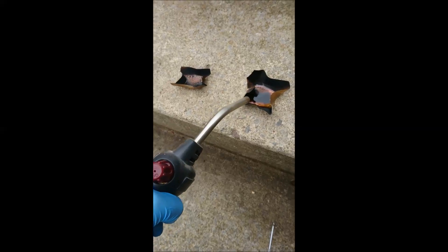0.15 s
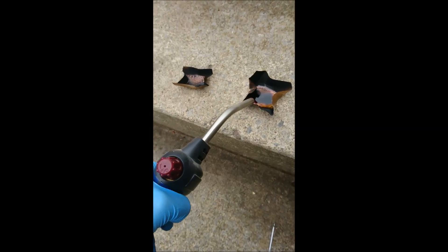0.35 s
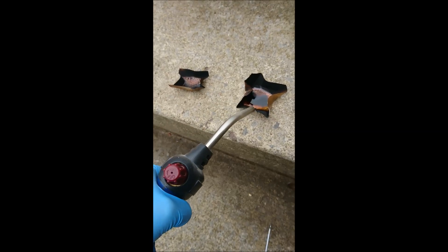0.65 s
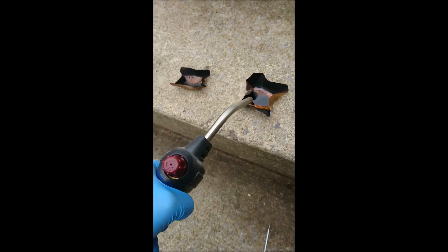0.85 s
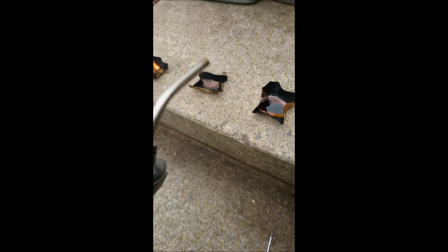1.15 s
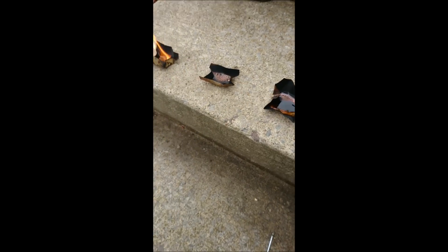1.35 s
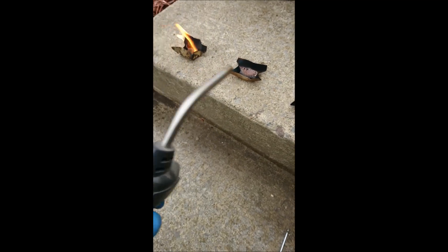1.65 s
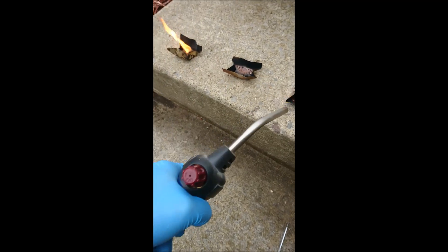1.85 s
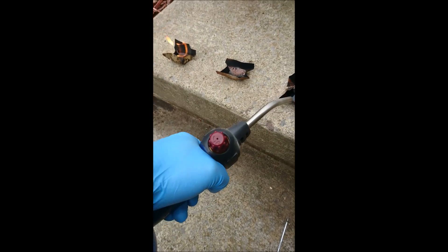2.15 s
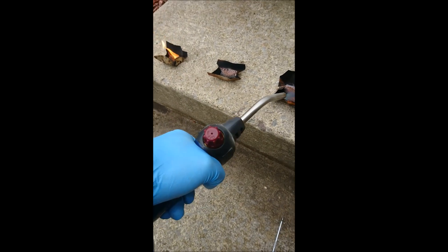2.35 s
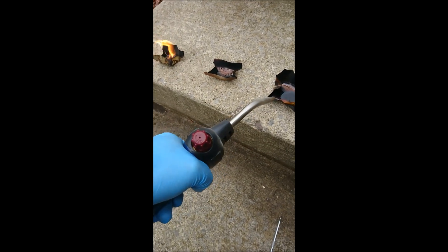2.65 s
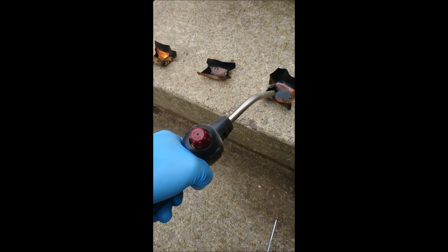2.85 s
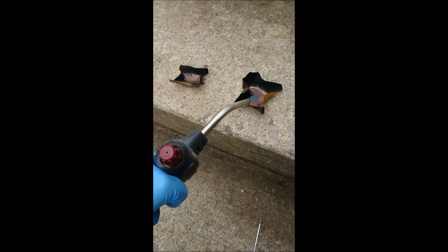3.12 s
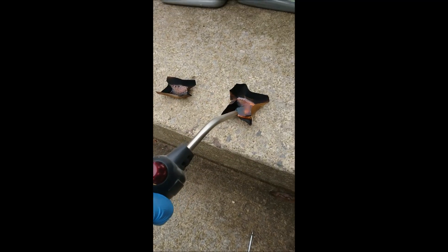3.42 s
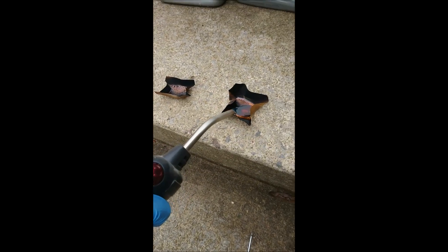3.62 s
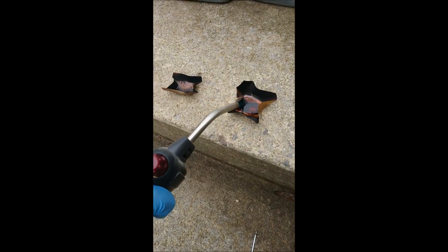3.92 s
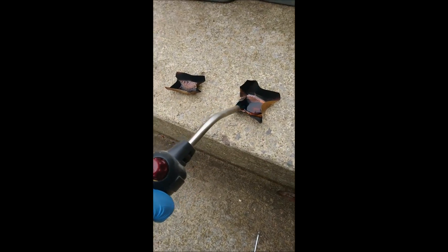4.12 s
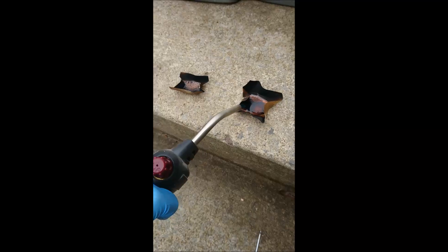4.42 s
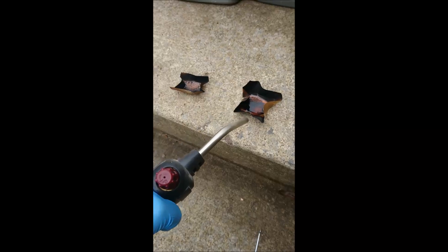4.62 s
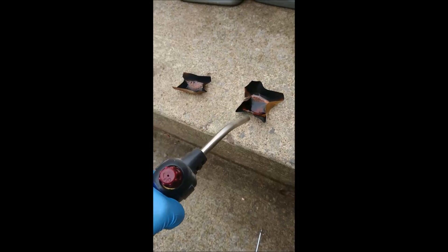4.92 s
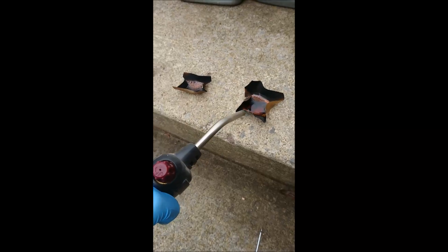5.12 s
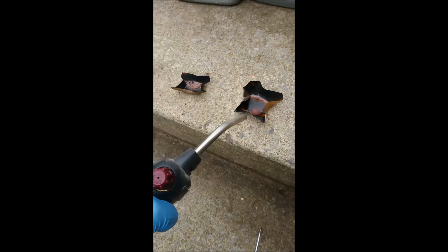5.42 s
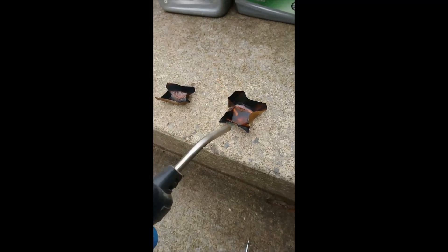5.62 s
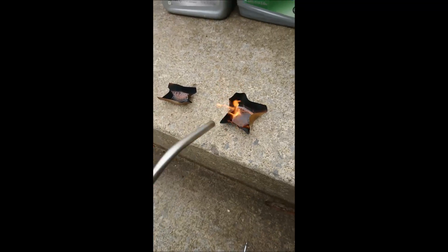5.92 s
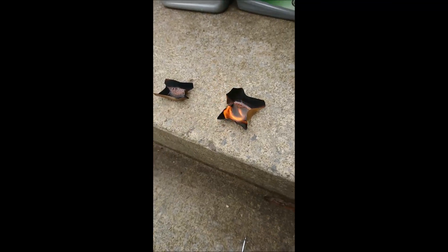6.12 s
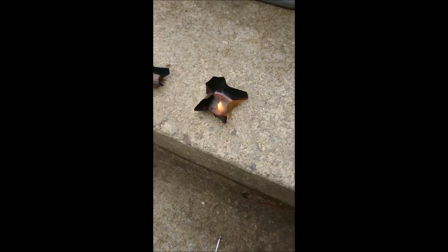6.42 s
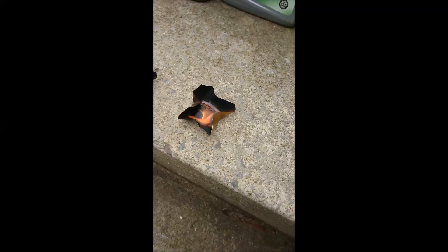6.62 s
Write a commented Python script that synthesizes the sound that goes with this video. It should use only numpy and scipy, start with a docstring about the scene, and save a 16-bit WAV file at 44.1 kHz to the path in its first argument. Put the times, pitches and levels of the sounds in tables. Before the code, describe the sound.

Outdoors, close stereo microphones over a concrete step, with a faint low rumble and thin even hiss. At 0.1 s a very loud, sharp igniter snap cracks with a low handle thump and short metallic ring; a gas puff flaps and dies with a soft thud by 0.3. Plastic trigger clicks tick at about 0.45 and 0.62 over faint seeping gas. A second snap at 0.73 brings another brief sputter and a thin, fading whistle. More clicks come from 1.07 to 1.24. The third snap at 1.34 lights the flame with a small whoosh, and a last click follows at 1.6. The flame roars and hisses steadily, far quieter than the snaps. From about 2.2 it presses on a charred scrap, turning duller, fluttering and uneven, with little pops and faint sizzling, especially from 3 to 5. Around 6 it lifts away, growing brighter and stronger, its concrete echo sweeping, and still burns at the end.

```python
"""The flame of a handheld gas torch, outdoors over a concrete step, close to two microphones: noise with a
fluttering envelope roars and hisses, is played on a charred scrap and lifted away, and delayed copies are its
echo off the concrete, sweeping with the height of the nozzle. Before it, three piezo snaps (noise bursts and
damped modes) bring two sputtering false starts and then the lasting flame. Trigger clicks, gas seeping and
whistling in the tube (resonated noise and gliding tones) and a low outdoor rumble surround them."""
import sys
import numpy as np
from scipy import signal
from scipy.fft import rfft, irfft, next_fast_len
from scipy.io import wavfile
from scipy.ndimage import uniform_filter1d, map_coordinates

SR = 44100
rng = np.random.default_rng(int(sys.argv[2]) if len(sys.argv) > 2 else 0)


def wrap_up_sound(samples):
    """Save the sound to the file named by the first command line argument, as 16-bit audio."""
    columns = np.atleast_2d(samples).T
    # keep every value between -1 and 1, then stretch to whole-number steps
    tamed = np.clip(columns, -1, 1)
    steps = np.round(tamed * 32767).astype(np.int16)
    wavfile.write(sys.argv[1], SR, steps)


N = 298557
T = np.arange(N) / SR
LIT_S = 1.352  # the lasting flame lights


def gain_of(db):
    """Level: decibels to an amplitude ratio."""
    return 10 ** (np.asarray(db) / 20)


def evened(x):
    """Normalization: scales to a root-mean-square of 1."""
    return x / np.sqrt(np.mean(x ** 2) + 1e-20)


def follow(rows):
    """Linear interpolation: each column of a curve table at every sample."""
    seconds, *columns = np.transpose(rows)
    return [np.interp(T, seconds, column) for column in columns]


def coloured(x, spectrum, tilt_db=0):
    """Minimum-phase filtering: the spectrum, tilted by dB per octave, keeps the power of white noise."""
    size = next_fast_len(x.shape[-1] + 4096)
    octave = np.log2(abs(np.fft.fftfreq(size, 1 / SR)) + 1)
    hz, db = np.transpose(spectrum)
    corner_octave = np.log2(hz + 1)
    db = np.interp(octave, corner_octave, db + tilt_db * corner_octave)
    log_gain = np.log(evened(gain_of(db)) + 1e-6)
    # the phase that makes the filter causal is the Hilbert transform of the log gain
    response = np.exp(np.conj(signal.hilbert(log_gain)))
    return np.fft.ifft(np.fft.fft(x, size) * response).real[..., :x.shape[-1]]


def wander(hz):
    """Band-limited random modulation: rms 1, changes up to about hz, the drift below 6 Hz held back."""
    f = np.fft.rfftfreq(N, 1 / SR)
    response = f / (f + 6) / np.sqrt(1 + (f / hz) ** 4)
    return evened(irfft(rfft(rng.standard_normal(N)) * response, N))


def noise_pair(apart, size=N):
    """Partial coherence: white noise at two microphones; the power share 'apart' is not common to both."""
    apart = np.clip(apart, 0, 1)
    common = rng.standard_normal(size)
    return np.sqrt(1 - apart) * common + np.sqrt(apart) * rng.standard_normal((2, size))


def panned(x, left_db):
    """Interchannel level difference: makes the left side louder by left_db."""
    return x * gain_of([[left_db / 2], [-left_db / 2]])


def resonate(x, hz, width):
    """Tuned resonance: a steep two-pole peak that can follow a pitch curve; rms 1."""
    turn = np.exp(2j * np.pi * np.cumsum(hz * np.ones(N)) / SR)
    r = np.exp(-np.pi * width / SR)
    # shift the pitch to zero, low-pass there, and shift back
    slow = signal.lfilter([1], [1, -2 * r, r * r], x / turn)
    return evened((turn * slow).real)


def swing(t, hz, t60, rise):
    """Damped oscillation: one heavily damped mode that builds up over 'rise' seconds."""
    t = np.maximum(t, 0)
    return -np.sin(2 * np.pi * hz * t) * np.exp(-np.log(1000) * t / t60) * (1 - np.exp(-t / rise))


def add(mix, s, sound):
    """Superposition: mixes a sound in at time s."""
    part = mix[:, max(round(s * SR), 0):][:, :sound.shape[1]]
    part += sound[:, :part.shape[1]]


# spectrum of the open air: pitch_hz, level_db (relative)
AIR_SPECTRUM = [(30, 0), (55, 23.5), (100, 23), (170, 18), (320, 9.5), (700, 5), (1500, -4), (2000, -35),
                (3100, -2.5), (7200, -1), (8200, -7), (10500, -5.5), (16000, -61)]
AIR_DB = -56.5


def air():
    """Steady broadband noise: a low outdoor rumble and a thin, even hiss."""
    return panned(gain_of(AIR_DB) * evened(coloured(noise_pair(0.28), AIR_SPECTRUM)), left_db=-3.5)


# resonances of the gas-filled tube: pitch_hz, width_hz, level_db
TUBE_RESONANCES = [(1230, 96, -71), (2210, 73, -74), (2564, 240, -65.5), (3770, 170, -72)]
# spectrum of the gas seeping from the jet: pitch_hz, level_db (relative)
SEEP_SPECTRUM = [(1200, -0.5), (3000, -7), (6800, -2), (8200, -13), (10000, -8), (15000, -12)]
# knocks that set the gas in the tube ringing: start_s, pitch_hz (once settled), level_db
TUBE_WHISTLES = [(0.462, 1624, -54.5), (0.738, 1610, -41.5), (0.738, 2164, -50)]
# the whistle starts sharp and settles as the tube refills
WHISTLE_SHARP_HZ, WHISTLE_SETTLE_S, WHISTLE_T60_S = 80, 0.0396, 0.45


def unlit_gas(seep_db=-62, waver_db=2.5):
    """Tube resonance: seeping gas drives it with noise until the flame is lit; a knock makes it whistle."""
    whistle, t = np.zeros((2, N)), np.arange(SR) / SR
    for s, hz, db in TUBE_WHISTLES:
        turns = np.cumsum(hz + WHISTLE_SHARP_HZ * np.exp(-t / WHISTLE_SETTLE_S)) / SR
        tone = gain_of(db - 60 * t / WHISTLE_T60_S) * np.sqrt(2) * np.sin(2 * np.pi * turns)
        add(whistle, s, tone[None])
    tube = sum(gain_of(db) * resonate(noise_pair(0.85), hz, width) for hz, width, db in TUBE_RESONANCES)
    seep = gain_of(seep_db) * coloured(noise_pair(1.0), SEEP_SPECTRUM)
    return (gain_of(waver_db * wander(hz=30)) * whistle + tube + seep) * (T < LIT_S)


# clicks of the trigger: start_s, scrape_db, brightness_db_per_octave, handle_knock_db
TRIGGER_CLICKS = [(0.4572, -33, 4.5, -25), (0.4608, -42.5, -2.5, -39), (0.6167, -36, 4.5, -29.5),
                  (0.632, -33.5, -4, -34), (1.073, -59, -5, -37.5), (1.1295, -29.5, 3.5, -54),
                  (1.133, -30.5, 4, -31), (1.2373, -38.5, -1, -28), (1.593, -33, 2.5, -27)]
# spectrum of the plastic scrape: pitch_hz, level_db (relative)
SCRAPE_SPECTRUM = [(240, -35), (400, -22.5), (588, -6.5), (1270, -4.5), (2510, -3), (3260, -17),
                   (3810, -8.5), (5030, -20), (5520, -9.5), (7990, -28.5), (9180, -25), (13500, -39),
                   (16000, -33)]


def trigger(fade_s=0.0052, tail_db=-22, tail_s=0.057):
    """Friction and impact: the plastic trigger catches and springs back, a short scrape and a hollow knock."""
    out, t = np.zeros((2, N)), np.arange(SR // 5) / SR
    for s, db, bright_db, knock_db in TRIGGER_CLICKS:
        scrape = t / fade_s * np.exp(1 - t / fade_s * 2) * 2 + gain_of(tail_db) * np.exp(-t / tail_s)
        noise = scrape * noise_pair(0.89, size=len(t))
        tick = gain_of(db) * coloured(noise, SCRAPE_SPECTRUM, bright_db)
        add(out, s, tick + gain_of(knock_db) * swing(t, hz=617, t60=0.03, rise=0.0019))
    return out


# false starts of the flame: start_s, length_s, level_db (reached at the end)
FALSE_STARTS = [(0.131, 0.0088, -33.5), (0.186, 0.088, -33), (0.732, 0.031, -38.5), (0.798, 0.035, -34.5)]
# spectrum of the flapping flame: pitch_hz, level_db (relative)
SPUTTER_SPECTRUM = [(30, -10), (130, -1), (288, 0.5), (383, -11.5), (624, -4), (1380, -17.5), (2040, -19.5),
                    (4000, -30), (7170, -33), (14000, -51)]
# low thuds as a pocket of gas goes up: start_s, level_db
GAS_THUDS = [(0.159, -30), (0.2749, -23.5), (0.835, -25.5)]
SPUTTER_RISE_S, SPUTTER_GROWTH_DB_PER_S, SPUTTER_OUT_S = 0.02, 28, 0.017


def sputter(flutter_db=1.5):
    """Unstable combustion: a pocket of gas catches, flaps ever harder at the nozzle and blows out."""
    burning = np.zeros(N)
    for s, length, db in FALSE_STARTS:
        past_end = T - s - length
        rise = np.clip((T - s) / SPUTTER_RISE_S, 0, 1)
        growth = rise * gain_of(db + SPUTTER_GROWTH_DB_PER_S * np.minimum(past_end, 0))
        burning += growth * np.exp(-np.maximum(past_end, 0) / SPUTTER_OUT_S)
    puffs = evened(gain_of(flutter_db * wander(hz=220)) * noise_pair(0.54))
    out, t = burning * coloured(puffs, SPUTTER_SPECTRUM), np.arange(SR // 8) / SR
    for s, db in GAS_THUDS:
        add(out, s, gain_of(db) * swing(t, hz=173, t60=0.061, rise=0.0011)[None])
    return panned(out, left_db=-1.5)


def ring(modes, t):
    """Modal decay: dying modes, excited differently by each blow as the grip shifts."""
    total = 0
    for hz, db, t60 in modes:
        level = gain_of(db + 3 * rng.uniform(-1, 1) - 60 * t / t60)
        turns = hz * rng.uniform(.996, 1.004) * t
        # each mode reaches the two microphones in its own phase
        total = total + level * np.sin(2 * np.pi * (turns + rng.random((2, 1))))
    return total


# spectrum of the igniter's crack, also of its fine ringing: pitch_hz, level_db (relative)
CRACK_SPECTRUM = [(240, -34), (600, -17), (1200, -5.5), (1450, -20), (2300, 1.5), (3050, -8), (4300, 3),
                  (5100, 2), (5450, -2), (5800, -1.5), (7400, -1.5), (7900, -6), (9000, 0.5), (10500, -11),
                  (14500, -5), (16000, -24)]


def fine_ring(t, count=70, level_db=-31, t60_s=0.14):
    """High modal density: many faint modes of the torch's small parts, coloured like the crack."""
    cloud = sum(np.sin(2 * np.pi * (hz * t + rng.random((2, 1)))) for hz in rng.uniform(1400, 10000, count))
    return coloured(gain_of(level_db - 60 * t / t60_s) * evened(cloud), CRACK_SPECTRUM)


# igniter snaps: start_s, crack_db, thump_db, handle_knock_db, metal_ring_db, spring_zing_db
IGNITER_SNAPS = [(0.1103, -8, 1, -17, -30.5, -34.5), (0.7303, -8.5, -0.5, -4, -30, -51),
                 (1.3448, -8, -4.5, -5, -33.5, -40)]
# modes of the torch's case: pitch_hz, level_db, t60_s
CASE_MODES = [(1720, -7, 0.093), (2214, 2, 0.038), (2370, -17, 0.092), (3530, -14.5, 0.097),
              (4130, 5, 0.032), (4350, -15, 0.1), (4700, -10, 0.12), (4850, -10, 0.047), (5660, -7, 0.071),
              (7550, -21, 0.075), (8800, -12, 0.023)]
# modes of its tube and fittings: pitch_hz, level_db, t60_s
METAL_MODES = [(1500, -8, 0.23), (1820, -19.5, 0.49), (3700, -4, 0.31), (4140, -7.5, 0.34),
               (4743, -3, 0.23), (5100, -10, 0.29), (6930, 5, 0.15), (7000, 4, 0.1)]
SPRING_HZ, SPRING_SWELL_S = 6815, 0.027  # the return spring takes up the blow slowly
JOSTLE = 0.3  # share by which the rattle makes the metal ring uneven


def igniter(chatter_s=0.0032, fade_s=0.0024, rattle_db=-24, rattle_s=0.028, rattle_rough_db=-3,
            case_db=-15, left_tilt_db=-2):
    """Impact excitation: the hammer chatters, loose parts rattle, case and spring ring, the torch recoils."""
    out, t = np.zeros((2, N)), np.arange(SR // 2) / SR
    for s, crack_db, thump_db, knock_db, metal_db, spring_db in IGNITER_SNAPS:
        loose = wander(hz=300)[:len(t)]
        rattle = gain_of(rattle_db + rattle_rough_db * loose) * np.exp(-t / rattle_s)
        blow = np.exp(-np.maximum(t - chatter_s, 0) / fade_s) + rattle * (t > chatter_s)
        left, right = gain_of(crack_db) * blow * noise_pair(0.97, size=len(t))
        # the left microphone faces away
        crack = np.array([coloured(left, CRACK_SPECTRUM, left_tilt_db), coloured(right, CRACK_SPECTRUM)])
        case_ring = gain_of(case_db) * ring(CASE_MODES, t)
        metal_ring = gain_of(metal_db) * ring(METAL_MODES, t) * (1 + JOSTLE * loose)
        rings = case_ring + metal_ring + fine_ring(t)
        spring_swell = (t / SPRING_SWELL_S * np.exp(1 - t / SPRING_SWELL_S)) ** 3
        zing = spring_swell * np.sin(2 * np.pi * (SPRING_HZ * t + rng.random((2, 1))))
        recoil = swing(t - .0035, hz=155.6, t60=0.026, rise=0.0046)
        recoil += 0.19 * swing(t - .0048, hz=292, t60=0.028, rise=0.0025)
        knock = swing(t - .002, hz=597, t60=0.023, rise=0.0022)
        handle = gain_of(thump_db) * recoil + gain_of(knock_db) * knock
        snap = crack + rings * (1 - np.exp(-t / 0.00074)) + gain_of(spring_db) * zing + handle
        add(out, s, panned(snap, left_db=-2.2))
    return out


def scattered(x, count=4):
    """Diffuse scattering: short, dense reflections off rough concrete, drifting as the hand moves."""
    t = np.arange(SR // 12) / SR
    taps = rng.standard_normal((count, 2, len(t))) * np.exp(-t / 0.0053) * (t > .002)
    shares = np.array([wander(hz=2.84) for _ in taps])
    shares = shares / np.linalg.norm(shares, axis=0)
    total = 0
    for share, tap in zip(shares, taps):
        tap = tap / np.linalg.norm(tap[0])
        total = total + signal.oaconvolve((share * x)[None], tap, axes=1)[:, :N]
    return total


# path of the nozzle: time_s, scrap_contact (0-1), ground_echo_delay_ms, left_microphone_lead_ms
NOZZLE_PATH = [(1.4, 0.04, 1.53, 0.27), (1.79, 0.29, 1.52, .27), (2.0, 0.25, 1.17, 0.16),
               (2.16, 0.73, 1.02, 0.15), (4.5, 0.68, 1.05, 0.1), (5.9, 0.99, 1.03, 0.068),
               (6.03, 0.6, 1.09, 0.07), (6.11, 0.33, 1.21, 0.11), (6.42, 0.43, 1.715, 0.16),
               (6.65, 0.26, 1.9, 0.17)]
# how far the flame reaches into the curl of the scrap: time_s, reach (0-1)
CURL_REACH = [(2.2, 0.04), (3.3, 0.5), (4.55, 0.55), (4.8, 0.15), (5.9, 0.38)]
CURL_ECHO, CURL_LEFT_MS, CURL_RIGHT_MS = 0.5, 1.496, 1.733  # the far side of the curl throws the sound back
TREMOR_MS = 0.025


def over_concrete(x, ground_echo=0.47, left_shade=0.68, scatter=0.46, left_path=1.225):
    """Comb filtering: direct sound, moving echoes off the step and the scrap, and faint scatter."""
    contact, echo_ms, lead_ms = follow(NOZZLE_PATH)
    inside = contact * follow(CURL_REACH)[0]
    left_echo = ground_echo * (1 - left_shade * inside)  # the scrap hides the concrete from the left microphone
    curl = CURL_ECHO * inside
    tremor_ms = TREMOR_MS * contact * wander(hz=1.6)  # the unsteady hand shifts the echoes

    def late(ms):
        """Propagation delay: the sound some milliseconds later, with a moving delay."""
        return map_coordinates(x, [np.arange(N) - ms * SR / 1000], order=3)

    left = x + left_echo * late(left_path * echo_ms + tremor_ms) + curl * late(CURL_LEFT_MS + tremor_ms)
    right = late(lead_ms) + ground_echo * late(lead_ms + echo_ms + tremor_ms)
    right += curl * late(lead_ms + CURL_RIGHT_MS + tremor_ms)
    total_power = 1 + ground_echo ** 2 + curl ** 2 + scatter ** 2
    return (np.array([left, right]) + scatter * scattered(x)) / np.sqrt(total_power)


# how each microphone hears the nozzle: pitch_hz, level_db (relative)
LEFT_RESPONSE = [(400, 2), (500, -1), (700, 5), (880, 3.5), (1020, -1), (1200, 2), (2000, 1.5), (2900, 3),
                 (3700, 6.5), (6700, 4), (7700, -7.5), (8600, 1.5), (15000, 3)]
RIGHT_RESPONSE = [(400, -1.5), (520, 3.5), (700, 6), (900, -1.5), (1170, 4.5), (1500, -0.5), (2300, 1),
                  (2800, 4.5), (3400, 6.5), (6000, 3), (9700, 5), (15000, 2.5)]


def microphones(pair, left_db=1.73, right_db=1.3):
    """Frequency response: each microphone colours the sound from the nozzle in its own way."""
    left = gain_of(left_db) * coloured(pair[0], LEFT_RESPONSE)
    right = gain_of(right_db) * coloured(pair[1], RIGHT_RESPONSE)
    return np.array([left, right])


# spots on the scrap that sizzle under the flame: start_s, length_s, pitch_hz, level_db
HOT_SPOTS = [(2.2, 0.26, 7350, -66), (2.965, 0.87, 5700, -68), (3.973, 0.44, 6160, -57),
             (4.496, 0.31, 5560, -59.5)]


def sizzle(fizz):
    """Resonated jet noise: the jet sings over hot spots of the scrap; each swells and fades."""
    total = 0
    for s, length, hz, db in HOT_SPOTS:
        swell = np.sqrt(abs(np.sin(np.pi * np.clip((T - s) / length, 0, 1))))
        total = total + gain_of(db) * swell * resonate(fizz, hz, width=3000)
    return total


# strength of the flame: time_s, roar_db, gas_jet_hiss_db (hiss_trim_db is added to the hiss)
FLAME_STRENGTH = [(1.42, -37, -46.5), (1.62, -42, -57.5), (1.76, -39, -50.5), (2.1, -39.5, -53),
                  (2.2, -44, -57), (2.35, -40, -55), (2.5, -44.5, -59), (2.62, -42, -56),
                  (3.05, -43.5, -55), (3.9, -41.5, -60.5), (4.17, -40, -55.5), (4.45, -41.5, -56),
                  (4.72, -39.5, -66), (4.82, -44.5, -59.5), (5.25, -41.5, -50.5), (5.47, -45.5, -55.5),
                  (5.6, -43.5, -52), (5.88, -48, -58), (6.07, -45, -53), (6.38, -39, -51),
                  (6.47, -42, -54.5), (6.66, -38, -50), (6.76, -36.5, -52)]
# pops and short swells of the flame, on the scrap and while it is lifted away:
# start_s, pop_db (over the turbulence), swell_db, length_s
FLAME_POPS = [(2.251, 16, 4, 0.026), (2.948, 13, -1, 0.047), (3.018, 22, 2.5, 0.056), (3.288, 16, 4, 0.027),
              (3.346, 16, 4.5, 0.015), (3.392, 23, 1.5, 0.035), (3.776, 29.5, 0, 0.017),
              (3.839, 18, 4.5, 0.038), (3.998, 20, 1.5, 0.018), (4.132, 26.5, 1.5, 0.023),
              (4.157, 29, 3.5, 0.016), (4.331, 26, 4, 0.033), (4.608, 29.5, 4, 0.037), (4.712, 6, 4, 0.16),
              (4.86, 8, 6, 0.039), (4.936, 24, 2.5, 0.016),  (5.675, 27, 1.5, 0.022),
              (5.949, 19, 2.5, 0.057), (6.198, 14, 4, 0.019), (6.352, 12, 2, 0.051),
              (6.641, 17, 2.5, 0.064)]
# moments when the flame falters: centre_s
FLAME_LULLS = [2.24, 2.545, 3.0, 3.14, 3.383, 3.99, 4.79, 5.85, 6.46]
# spectra of the roar in open air and pressed on the scrap, of the gas jet's hiss, and of the low rumble:
# pitch_hz, level_db (relative)
FREE_SPECTRUM = [(280, -20), (400, 0), (540, 0.5), (700, -6), (850, 0.5), (1300, -5), (2200, -9.5),
                 (2900, -12), (3500, -18.5), (6000, -24), (12000, -37.5)]
PRESSED_SPECTRUM = [(300, -20), (440, -1), (540, 0), (680, -0.5), (790, -6.5), (930, -9), (1150, -8),
                    (1450, -14), (1800, -16), (2250, -18), (2900, -25), (3400, -43), (7000, -32.5),
                    (14000, -70)]
HISS_SPECTRUM = [(1500, -26), (3200, -2), (4500, 3.5), (6000, 4), (7200, 7.5), (8000, -4.5), (9800, -5.5),
                 (12000, -8), (15000, -13), (16000, -2)]
RUMBLE_SPECTRUM = [(25, -36), (40, -14), (65, -1.5), (110, -5), (165, 4.5), (230, -3.5), (290, 1),
                   (360, -16.5), (500, -9.5), (1000, -46.5)]
RUMBLE_DB = -46.5
POP_RISE_S, LULL_S, LULL_DB = 0.0032, 0.015, -6
HISS_GUST = 1.7  # gusts tear at the hiss hardest
# the tip rushes over the concrete, lower the higher the nozzle: pitch at an echo delay of 1 ms, power of the fall
RUSH_HZ, RUSH_FALL, RUSH_DB, RUSH_WIDTH_HZ = 3350, 1.72, -47.5, 950
RUSH_SHADED = 0.35  # contact at which the scrap halves the rush
RUSH_DRAG_DB = 3.5  # per ms/s of growth in the echo delay: pulled back, the flame tears and rushes louder
GROW_S = 0.56  # the flame reaches its full length in this time
WHOOSH_HZ, WHOOSH_DB, WHOOSH_S = 2310, -45, 0.1  # the gathered gas burns off on lighting
# the curl resonates, higher with the flame inside it; level relative to the roar
HOLLOW_HZ, HOLLOW_RISE_HZ, HOLLOW_WIDTH_HZ, HOLLOW_DB, HOLLOW_RISE_DB = 2716, 303, 216, -20.5, 0


def flame(free_flutter_db=1.0, pressed_flutter_db=4.5, gust_db=1.22, hiss_swell=1.1, hiss_pop=0.7,
          hiss_trim_db=-1, pressed_hiss_db=-6.5, pressed_tilt_db=-3, whoosh_width_hz=2400):
    """Turbulent combustion noise: gas burns in quick puffs; pressed on the scrap, duller and more ragged."""
    contact, echo_ms, _ = follow(NOZZLE_PATH)
    contact = np.clip(contact, 0, 1)
    inside, = follow(CURL_REACH)
    roar_db, hiss_db = follow(FLAME_STRENGTH)
    flutter_range_db = free_flutter_db + contact * (pressed_flutter_db - free_flutter_db)
    eddies_db = flutter_range_db * wander(hz=267)
    gusts_db = gust_db * wander(hz=33.5)
    flutter_db = eddies_db + gusts_db

    def churn(modulation_db):
        """Amplitude modulation: one turbulence shakes each part of the flame by its own amount."""
        return evened(gain_of(modulation_db) * rng.standard_normal(N))

    puffs, swell_db = churn(0.82 * flutter_db), np.zeros(N)
    fizz = churn(eddies_db + HISS_GUST * gusts_db)
    for s, pop_db, rise_db, length in FLAME_POPS:
        puffs[round(s * SR)] -= gain_of(pop_db)
        fizz[round(s * SR)] -= hiss_pop * gain_of(pop_db)
        swell_db += rise_db * np.clip((T - s) / POP_RISE_S, 0, 1) * np.exp(-((T - s) / length) ** 4)
    for s in FLAME_LULLS:
        swell_db += LULL_DB * np.exp(-((T - s) / LULL_S) ** 2)
    swelling_fizz = fizz * gain_of(swell_db)

    roar = (1 - contact) * coloured(puffs, FREE_SPECTRUM) + contact * coloured(puffs, PRESSED_SPECTRUM)
    roar *= gain_of(roar_db + swell_db)
    pressed_hiss = gain_of(pressed_hiss_db) * coloured(fizz, HISS_SPECTRUM, pressed_tilt_db)
    hiss = (1 - contact) * coloured(fizz, HISS_SPECTRUM) + contact * pressed_hiss
    hiss *= gain_of(hiss_db + hiss_trim_db + hiss_swell * swell_db)

    reach = np.clip((T - LIT_S) / GROW_S, 0, 1) ** 2 / (1 + (contact / RUSH_SHADED) ** 6)
    drag_db = RUSH_DRAG_DB * uniform_filter1d(np.maximum(np.gradient(echo_ms, T), 0), SR // 20)
    rush = resonate(swelling_fizz, RUSH_HZ / echo_ms ** RUSH_FALL, RUSH_WIDTH_HZ)
    rush *= reach * gain_of(RUSH_DB + drag_db + roar_db - roar_db.mean())
    burn_off = np.exp(-np.maximum(T - LIT_S, 0) / WHOOSH_S)
    whoosh = gain_of(WHOOSH_DB) * burn_off * resonate(churn(flutter_db), WHOOSH_HZ, whoosh_width_hz)
    hollow = resonate(puffs, HOLLOW_HZ + HOLLOW_RISE_HZ * inside, HOLLOW_WIDTH_HZ)
    hollow *= contact * gain_of(roar_db + swell_db + HOLLOW_DB + HOLLOW_RISE_DB * inside)

    nozzle = over_concrete(roar + hiss + rush + whoosh + sizzle(swelling_fizz))
    jet = microphones(nozzle + panned(hollow, left_db=-7.0))
    rumble = coloured(evened(gain_of(0.53 * flutter_db) * noise_pair(0.033)), RUMBLE_SPECTRUM)
    lit = np.clip((T - LIT_S) / 0.0038, 0, 1)
    return lit * (jet + panned(gain_of(RUMBLE_DB) * rumble, left_db=-3.5))


def scene():
    """Superposition: all sources together."""
    return air() + unlit_gas() + trigger() + sputter() + igniter() + flame()


def record(dry, low_cut_hz=50, ceiling=0.8, edge_hz=15950):
    """Band limiting and saturation: deep bass is cut, snaps overload the input softly, then the treble ends."""
    lean = signal.sosfilt(signal.butter(4, low_cut_hz, "high", fs=SR, output="sos"), dry)
    held = ceiling * np.tanh(lean / ceiling)
    band_limit = signal.firwin(511, edge_hz, window=("kaiser", 9), fs=SR)
    return signal.oaconvolve(held, band_limit[None], "same")


dry = scene()
out = record(dry)
wrap_up_sound(out)
```